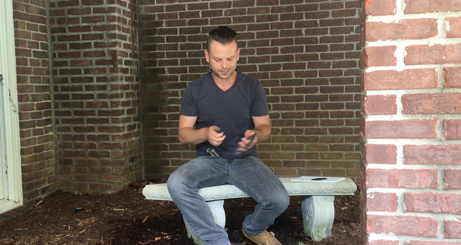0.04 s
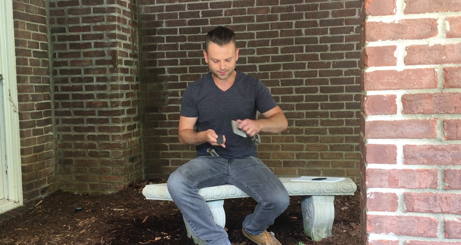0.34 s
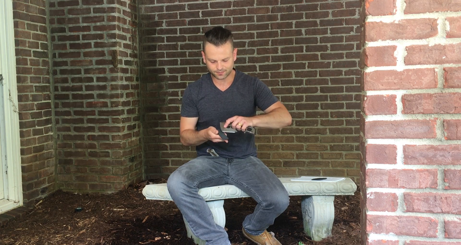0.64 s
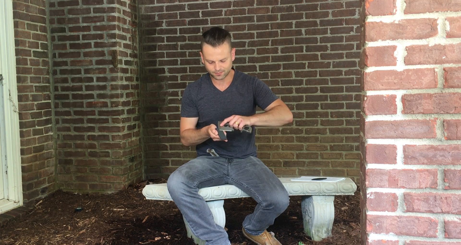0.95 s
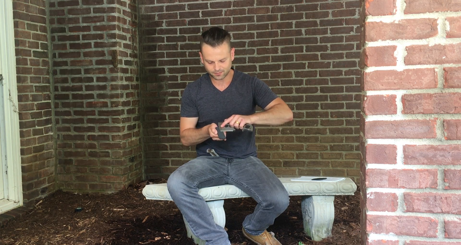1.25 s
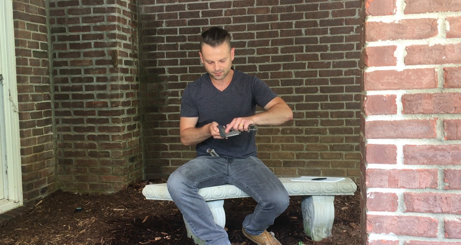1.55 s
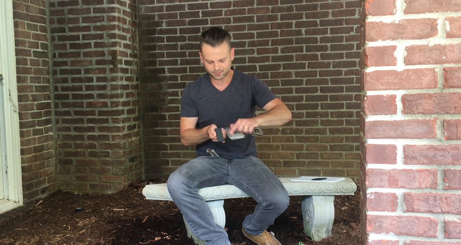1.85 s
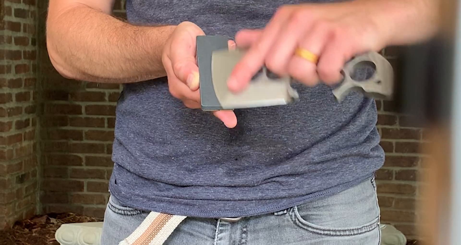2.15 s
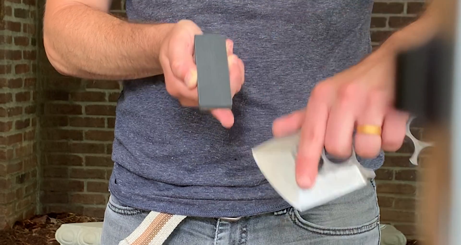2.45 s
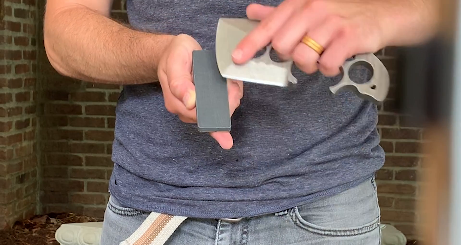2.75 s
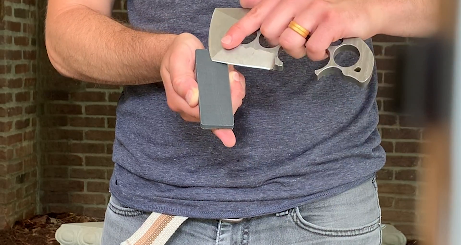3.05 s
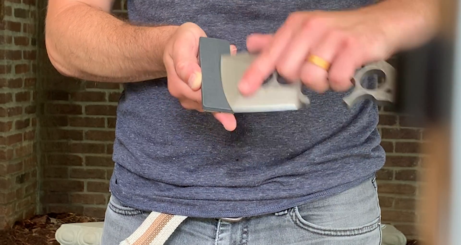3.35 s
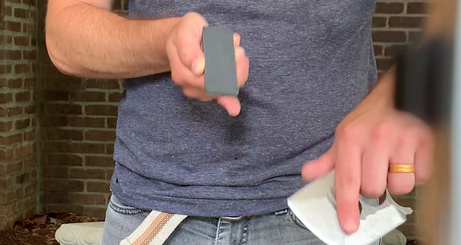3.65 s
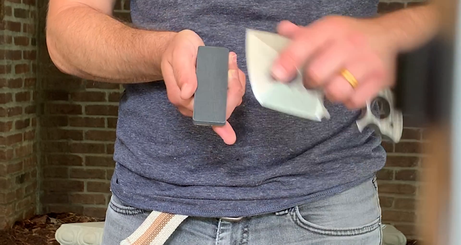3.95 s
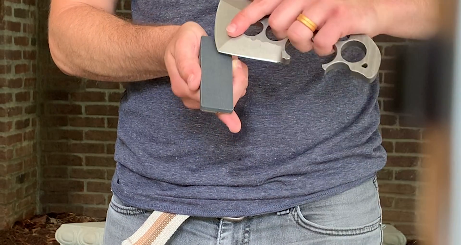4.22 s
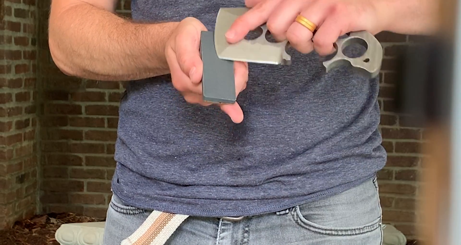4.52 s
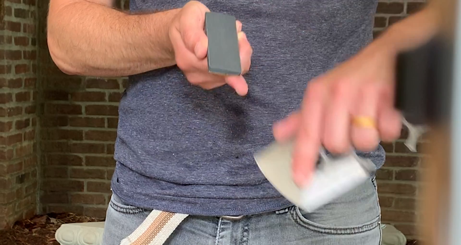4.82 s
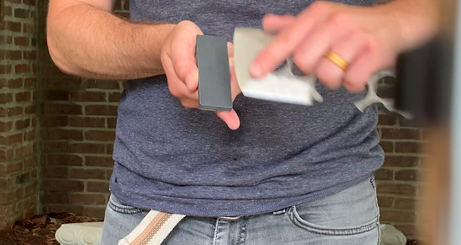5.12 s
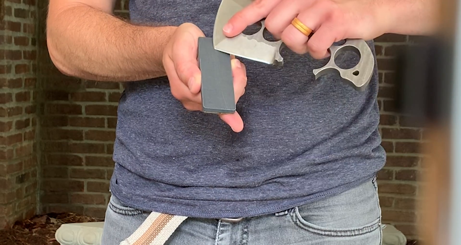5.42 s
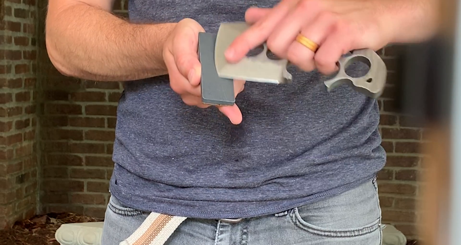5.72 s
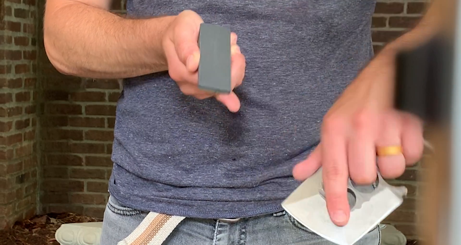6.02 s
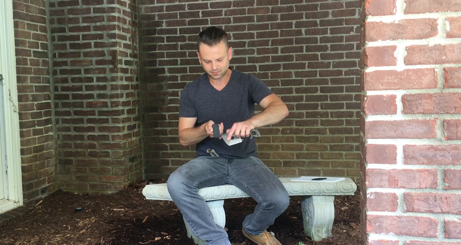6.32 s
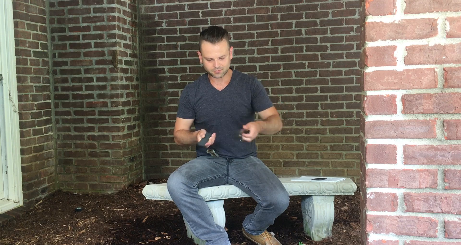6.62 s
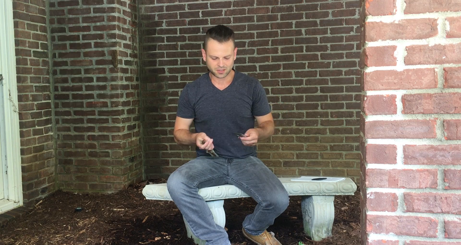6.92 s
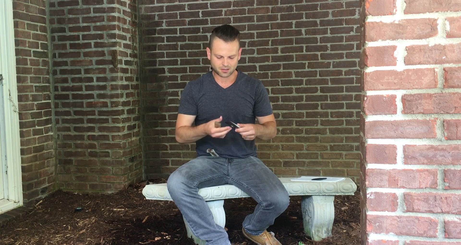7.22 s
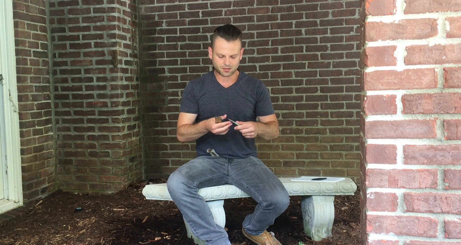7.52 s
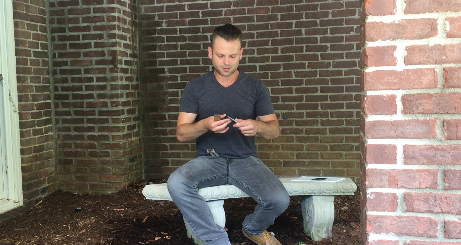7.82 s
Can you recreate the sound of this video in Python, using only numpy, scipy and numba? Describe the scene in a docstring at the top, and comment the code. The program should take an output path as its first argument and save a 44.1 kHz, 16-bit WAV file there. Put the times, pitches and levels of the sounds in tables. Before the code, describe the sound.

Outdoors, an air conditioner hums and throbs over a low rumble, with faint insects and a few distant bird whistles. Close to the microphone, a thick steel blade is drawn five times across a hand-held ceramic stone. The first two strokes land softly, the last three with a sharp clink; each is a gritty, ringing scrape that swells as it slips off the end. Small handle ticks and hand brushes come between, with a short echo off brick.

```python
"""An air conditioner hums and throbs; birds and a band of insects sound from far trees.
Then a thick steel blade is drawn five times over a hand-held ceramic stone in a brick alcove.
It lands with a clink, grit sets its modes ringing in tones that glide as the contact travels,
and its corner digs in and slips off the end. The handle ticks and the hands brush softly."""
import sys
import numpy as np
from scipy import signal
from scipy.fft import rfft, irfft
from scipy.io import wavfile
from numba import njit

SR = 44100
rng = np.random.default_rng(int(sys.argv[2]) if len(sys.argv) > 2 else 0)


def digitize_waveform(pressure):
    """Quantize a signal to 16-bit integers and store it at the path in sys.argv[1].

    Rows of a 2-D input are taken as channels; values are limited to [-1, 1].
    """
    field = np.atleast_2d(pressure).T
    bounded = np.clip(field, -1, 1)
    quanta = np.round(bounded * 32767).astype(np.int16)
    wavfile.write(sys.argv[1], SR, quanta)


N = 351276
T = np.arange(N) / SR


def from_db(db):
    """Decibels to gain."""
    return 10 ** (np.asarray(db) / 20)


def unit_rms(x):
    """Scale to rms 1."""
    return x / np.sqrt(np.mean(x ** 2) + 1e-20)


def drift(rate_hz):
    """Random wander of unit rms, low-passed at rate_hz."""
    hop, settle = 40, 2000
    pole = np.exp(-2 * np.pi * rate_hz * hop / SR)
    white = rng.standard_normal(N // hop + settle + 2)
    slow = signal.lfilter([1], [1, -2 * pole, pole * pole], white)[settle:]
    return np.interp(np.arange(N) / hop, np.arange(len(slow)), unit_rms(slow))


def noise(spectrum):
    """Coloured noise of unit rms, falling steeply beyond the spectrum's ends."""
    hz, db = np.transpose(spectrum)
    f = np.maximum(np.fft.rfftfreq(N, 1 / SR), 1)
    skirts = np.minimum(f / hz[0], 1) ** 4 * np.minimum(hz[-1] / f, 1) ** 4
    colour = from_db(np.interp(np.log(f), np.log(hz), db))
    return unit_rms(irfft(rfft(rng.standard_normal(N)) * skirts * colour, N))


def tone(hz):
    """Sine of unit rms on a pitch curve."""
    return np.sqrt(2) * np.sin(2 * np.pi * (np.cumsum(hz) / SR + rng.random()))


def bandpass(x, low_hz, high_hz):
    """Band-pass with 12 dB/octave skirts."""
    sos = signal.butter(2, [low_hz, min(high_hz, SR / 2.1)], "band", fs=SR, output="sos")
    return signal.sosfilt(sos, x)


def burst(start_s, decay_s):
    """Instant attack, exponential decay."""
    return (T >= start_s) * np.exp(-np.clip((T - start_s) / decay_s, 0, 40))


@njit
def resonator(drive, omega, radius):
    """One mode with moving pitch (rad/sample) and pole radius; a unit click rings at height 1."""
    out, state = np.zeros(len(drive)), 0j
    for i in range(len(drive)):
        state = state * radius[i] * complex(np.cos(omega[i]), np.sin(omega[i])) + drive[i] + 1e-18
        out[i] = state.imag
    return out


def echoes(x, t60_s, delay_s):
    """Dense decaying reflections, duller than the direct sound."""
    t = np.arange(SR) / SR
    tail = bandpass(rng.standard_normal(SR), 240, 9000) * from_db(-60 * t / t60_s) * (t > delay_s)
    return signal.fftconvolve(x, tail / np.sqrt(np.sum(tail ** 2)))[:N]


# Outdoor air, low and high spectra: f/Hz, relative density/dB
RUMBLE_SPECTRUM = [(20, -26), (30, -21), (40, -3), (49, 3), (58, -1), (72, 4.5), (105, -3), (173, -15.5),
                   (295, -22.5), (370, -22), (500, -27.5), (960, -30.5), (1500, -37)]
HISS_SPECTRUM = [(1500, 1), (2400, 2), (3500, -3.5), (4800, -6), (7000, -11.5), (10500, -9), (13000, -11),
                 (16000, -12.5)]

def outdoors(rumble_db=-49.5, hiss_db=-73.0, insects_db=-76.5, shimmer_db=1.5):
    """Far rumble, soft hiss and an even chorus of insects."""
    insects = noise([(5200, -11.5), (5600, 2.0), (5900, 6.0), (6150, 2), (6500, -17)])
    insects *= from_db(insects_db + shimmer_db * drift(17))
    air = from_db(rumble_db) * noise(RUMBLE_SPECTRUM) + from_db(hiss_db) * noise(HISS_SPECTRUM)
    return air + insects


# One long swooping whistle: t/s, f/Hz
BIRD_SWOOP = [(.33, 4170), (.56, 4220), (.73, 3220), (.9, 3160), (1.12, 3536), (1.38, 3740)]
# Rasping upward slurs: t/s, length/s, top f/Hz, source level/dB
BIRD_SLURS = [(.215, 0.17, 4290, -66), (6.871, 0.23, 3297, -64), (7.814, .15, 4320, -64.5)]
# Clear held notes: t/s, length/s, f/Hz, source level/dB
BIRD_NOTES = [(3.0, 0.17, 2790, -69.5), (3.04, 0.18, 3730, -70.5), (3.442, 0.082, 3746, -66),
              (6.5, 0.18, 2793, -76), (7.42, 0.044, 5396, -60)]
# Short falling chips: t/s, initial f/Hz, fall/fraction, source level/dB
BIRD_CHIPS = [(6.28, 2740, .1, -68.5), (6.65, 2710, .1, -70), (7.411, 5310, 0.36, -66.5),
              (7.479, 2520, 0.053, -72), (7.64, 2685, .11, -63)]

def birds(full_rasp_hz=260, slur_rise=0.18, slur_top_at=0.7, chip_s=0.04):
    """Whistles roughened by a fast pitch waver, blurred by trees and walls."""
    waver_hz = full_rasp_hz * drift(355)

    def whistle(start_s, length_s, db, pitch_hz, rasp):
        """One rounded note; pitch_hz maps progress u (0-1) to Hz."""
        out = np.zeros(N)
        on = (T >= start_s) & (T < start_s + length_s)
        u = (T[on] - start_s) / length_s
        phase = 2 * np.pi * np.cumsum(pitch_hz(u) + rasp * waver_hz[on]) / SR
        out[on] = from_db(db) * np.sqrt(np.abs(np.sin(np.pi * u))) * np.sin(phase)
        return out

    swoop_s, swoop_hz = np.transpose(BIRD_SWOOP)
    onset_s, span_s = swoop_s[0], np.ptp(swoop_s)
    song = whistle(onset_s, span_s, db=-74, rasp=0.18,
                   pitch_hz=lambda u: np.interp(onset_s + u * span_s, swoop_s, swoop_hz))
    for start_s, length_s, top_hz, db in BIRD_SLURS:
        song += whistle(start_s, length_s, db, rasp=0.533,
                        pitch_hz=lambda u: top_hz * (1 - slur_rise * (1 - u / slur_top_at) ** 2))
    for start_s, length_s, hz, db in BIRD_NOTES:
        song += whistle(start_s, length_s, db, lambda u: hz, rasp=0.12)
    for start_s, hz, fall, db in BIRD_CHIPS:
        song += whistle(start_s, chip_s, db, lambda u: hz * (1 - fall * u), rasp=0.48)
    return 0.86 * song + 0.88 * echoes(song, t60_s=0.63, delay_s=0.014)


# Main compressor tone: t/s, level/dB
COMPRESSOR_LEVEL = [(0.0, -45), (2.02, -39.5), (3.43, -45), (4.38, -55.5), (4.93, -52), (4.97, -60.5),
                    (6.25, -45), (7.9, -40.5)]
# Fan and motor tones: f/Hz, initial level/dB, final level/dB
FAN_TONES = [(134.9, -72, -67.5), (152.7, -66, -68), (182.8, -77.5, -73.5), (219.1, -64.5, -66.5),
             (245.6, -61.5, -65.5), (352, -72.5, -74), (438.3, -63.5, -71.5), (593, -78, -88.5),
             (970, -83, -82.5)]

def air_conditioner(compressor_hz=91, step_hz=1.196, step_at_s=4.5, beat_hz=14.8, wander_hz=0.4):
    """Two compressor tones beat and speed up slightly once; fan and motor add thin steady lines."""
    main_hz = compressor_hz + step_hz * (T > step_at_s)
    main_db = np.interp(T, *np.transpose(COMPRESSOR_LEVEL))
    hum = from_db(main_db) * tone(main_hz)
    lower_db = -50.5 + 1.5 * drift(0.97)
    hum += from_db(lower_db) * tone(main_hz - beat_hz + wander_hz * drift(1.34))
    for hz, first_db, last_db in FAN_TONES:
        line_db = np.linspace(first_db, last_db, N) - drift(1.26)
        hum += from_db(line_db) * tone(hz + wander_hz * drift(3.35))
    return hum


# Handle ticks: t/s, level/dB
HANDLE_TICKS = [(2.16, -73), (4.868, -46.5), (6.906, -62.5), (6.985, -69)]
# Hand brushes: t/s, level/dB, centre f/Hz, decay/s
HAND_BRUSHES = [(0.03, -62, 2700, 0.023), (.032, -62.5, 1140, 0.072), (.032, -73, 8800, 0.044),
                (0.934, -64.5, 2160, .03), (1.05, -68, 2020, 0.064), (2.391, -65.5, 1790, 0.069),
                (7.018, -64.5, 1290, .05)]

def handling(tick_hz=9400, tick_decay_s=0.0053, edge_ratio=1.36):
    """Dry ticks of the handle and softer brushes of the hands: bursts of band noise."""
    white = rng.standard_normal(N)
    ticks = [(start_s, db, tick_hz, tick_decay_s) for start_s, db in HANDLE_TICKS]
    out = np.zeros(N)
    for start_s, db, hz, decay_s in ticks + HAND_BRUSHES:
        edges_hz = hz / edge_ratio, hz * edge_ratio
        rustle = unit_rms(bandpass(bandpass(white, *edges_hz), *edges_hz))
        out += from_db(db) * rustle * burst(start_s, decay_s)
    return out


# Strokes: landing t/s, slip-off t/s, scrape level/dB, knock level/dB,
# knock tilt/(dB per 2 octaves), corner boost/dB
BLADE_STROKES = [(0.942, 1.732, -67.5, -65, 2, 10.5), (2.215, 2.897, -68, -51.5, -18, 13),
                 (3.353, 4.02, -66.5, -35.5, -3.5, 13), (4.483, 5.098, -67, -36, -4, 11.5),
                 (5.614, 6.212, -66.5, -34, -3.5, 9)]
# Hand pressure along a stroke: place/0-1, gain/dB
HAND_PRESSURE = [(0, -11), (.2, -7.5), (.42, -1.5), (.6, -2.5), (.8, -2), (1, 1)]

def stroke_motion(corner_share=0.15, lift_s=0.024):
    """Contact place along the edge (0-1) and scraping force; the corner digs in, then lifts."""
    place, force = np.zeros(N), np.zeros(N)
    for start_s, end_s, scrape_db, _, _, corner_db in BLADE_STROKES:
        u = np.clip((T - start_s) / (end_s - start_s), 0, 1)
        place = np.where(T >= start_s, u, place)
        touching = (T >= start_s) * np.clip((end_s - T) / lift_s + 0.5, 0, 1)
        pressure_db = np.interp(u, *np.transpose(HAND_PRESSURE))
        dig_db = corner_db * np.exp((u - 1) / corner_share)
        force += touching * from_db(scrape_db + pressure_db + dig_db)
    return place, force


def knocks(bounce_s=0.005, bounce_loss_db=4.5, slip_db=-57):
    """Each stroke lands, bounces once and slips off; returns times, levels and tilts."""
    rows = []
    for start_s, end_s, _, db, tilt_db, _ in BLADE_STROKES:
        rows += [(start_s, db, tilt_db),
                 (start_s + bounce_s, db - bounce_loss_db, tilt_db),
                 (end_s, slip_db, 0)]
    return np.transpose(rows)


# Stone in the hand: f/Hz, relative density/dB
CLACK_SPECTRUM = [(1100, -15), (1800, 1), (2400, 10), (3200, -22)]

def stone(re_knock_db=-17, decay_s=0.021):
    """The stone answers each landing with a short dull clack."""
    envelope = sum(from_db(knock_db + re_knock_db) * burst(start_s, decay_s)
                   for start_s, _, _, knock_db, _, _ in BLADE_STROKES)
    return noise(CLACK_SPECTRUM) * envelope


# Grit crackle, corner rasp, knock crack: f/Hz, relative density/dB
GRIT_SPECTRUM = [(1700, -9), (2300, 1), (4000, -6), (6200, -2), (6800, -13), (9800, -12), (13000, -18),
                 (15500, -15)]
CORNER_SPECTRUM = [(1900, -27), (2300, 8), (2750, -16), (3700, -12), (4400, 4), (5000, -3.5), (6300, 9),
                   (7000, -19), (9500, -5), (12000, -2), (13500, -14), (15500, -16)]
CRACK_SPECTRUM = [(700, -16), (1100, 6), (2000, 10), (4500, 14.5), (6500, 4), (10000, -40), (15500, -5)]

def contact_noise(force, corner, crush, grit_db=-4.5, rasp_db=5, crack_db=-13):
    """Crackling grit gives way to the corner's rasp; knocks crush grit with a crack."""
    crackle = from_db(grit_db) * (1 - corner) * noise(GRIT_SPECTRUM)
    rasp = from_db(rasp_db) * corner * noise(CORNER_SPECTRUM)
    crack = from_db(crack_db) * crush * noise(CRACK_SPECTRUM)
    return force * (crackle + rasp) + crack


def grit_impacts(grains_per_s=5000, size_db=1.5):
    """Grains strike the edge as random clicks of uneven size."""
    clicks = (rng.random(N) < grains_per_s / SR) * rng.standard_normal(N)
    sizes = from_db(size_db * np.minimum(rng.exponential(1, N), 3))
    return unit_rms(clicks * sizes)


# Blade modes: f/Hz, free t60/s, struck gain/dB, scraped gain/dB,
# liveliest place/0-1, reach/stroke, pitch rise there/fraction
BLADE_MODES = [(1200, .02, -19, -20, .2, .4, .03), (1925, .03, -7, -5, .2, .2, .01),
               (2200, .025, -10, 2, .4, .35, .08), (2760, .025, -14, -3, .7, .3, .04),
               (3170, .018, -17, 4, .58, .2, .04), (3550, .016, -16, -2, .85, .15, .03),
               (4350, .06, 0, 4, .5, .24, .06), (4440, .025, -5, -6, .1, .2, .02),
               (5290, .025, -8.5, -2, .6, .25, .06), (5850, .02, -17, -1, .85, .25, .03),
               (6270, .033, -14, 5, .9, .15, .022), (7690, .05, -18, -3.5, .82, .22, .04),
               (8850, .022, -14, -2, .38, .18, .02), (9620, .05, -17, 2, .64, .22, .038),
               (11120, .035, -28, -6.5, .7, .35, .004), (12020, .035, -18, -2, .42, .22, .02),
               (14450, .02, -32, -13, .95, .2, .01), (14980, .025, -30, -12.5, .5, .3, .015)]

def blade(chatter_db=1.5, rock_db=2.5, rock_share=0.01, base_coupling=0.15, damping=0.067,
          scrape_db=-8.5, crush_db=-23, corner_db=-4.5):
    """Grit and knocks ring the same modes; the stone stiffens and drives each where it moves most."""
    place, force = stroke_motion()
    pressed = force > 0
    force *= from_db(chatter_db * drift(59))
    grains = grit_impacts()
    corner = np.exp((place - 1) / 0.059)   # near the free corner every mode moves
    place += 0.042 * drift(1.0)   # no two strokes take the same path
    knock_s, knock_db, tilt_db = knocks()
    crush = sum(from_db(db) * burst(start_s, decay_s=0.0058) for start_s, db in zip(knock_s, knock_db))
    out = contact_noise(force, corner, crush)
    for hz, t60_s, struck_db, scraped_db, liveliest, reach, rise in BLADE_MODES:
        coupling = np.exp(-((place - liveliest) / reach) ** 2) * (1 - corner)
        glide = coupling * (rise + rock_share * drift(54))   # the edge rocks on the grit
        omega = 2 * np.pi * hz / SR * (1 + glide)
        free_loss = np.log(1000) / (t60_s * SR)
        loss = free_loss * (1 + damping * pressed * (0.5 + 2 * corner))   # pressed steel rings shorter
        grip = base_coupling + coupling + from_db(corner_db) * corner
        rubbing = force * grip * from_db(scraped_db + scrape_db + rock_db * drift(11))
        crushing = crush * from_db(struck_db + crush_db)
        drive = grains * (rubbing + crushing) * 2 * np.sqrt(loss)   # ring level independent of decay
        strike_db = knock_db + struck_db + tilt_db * np.log2(hz / 4350) / 2
        drive[(knock_s * SR).astype(int)] += rng.choice([-1, 1]) * from_db(strike_db)
        out += resonator(drive, omega, np.exp(-loss))
    return out


def scene():
    """The blade close by, with a short echo off the brick, in front of the yard."""
    near = blade() + stone() + handling()
    alcove = from_db(-13) * echoes(near, t60_s=0.36, delay_s=0.005)
    return (near + alcove + birds() + air_conditioner() + outdoors())[None]


# Microphone dips: f/Hz, Q, depth/0-1
RESPONSE_DIPS = [(4900, 9, .4), (10500, 12, .4)]
CUTOFF_HZ = 15650

def record(dry):
    """Microphone with two shallow dips and a steep top cut."""
    for hz, q, depth in RESPONSE_DIPS:
        dry = dry - depth * signal.lfilter(*signal.iirpeak(hz, q, fs=SR), dry)
    return signal.sosfilt(signal.ellip(10, 0.1, 80, CUTOFF_HZ, fs=SR, output="sos"), dry)


dry = scene()
out = record(dry)
digitize_waveform(out)
```